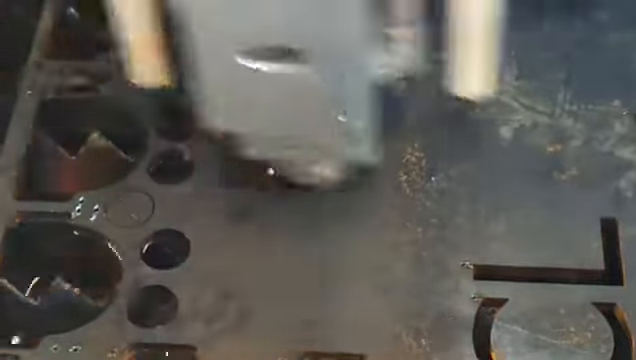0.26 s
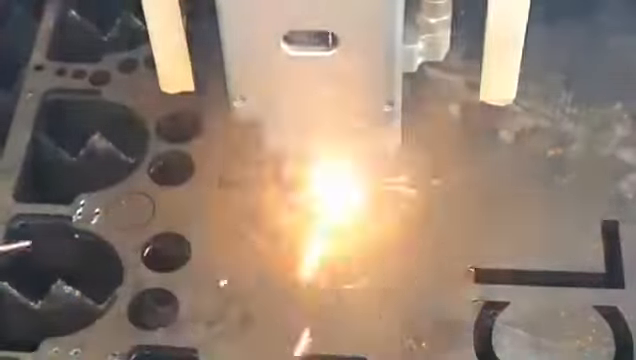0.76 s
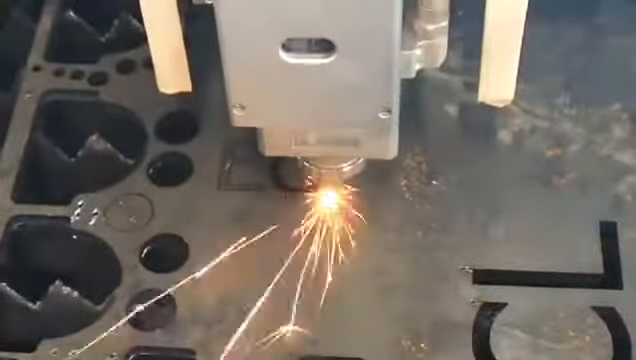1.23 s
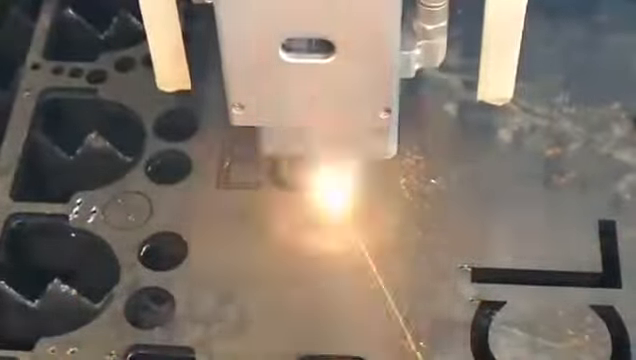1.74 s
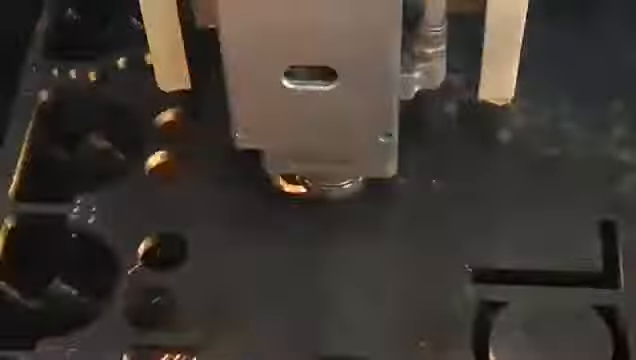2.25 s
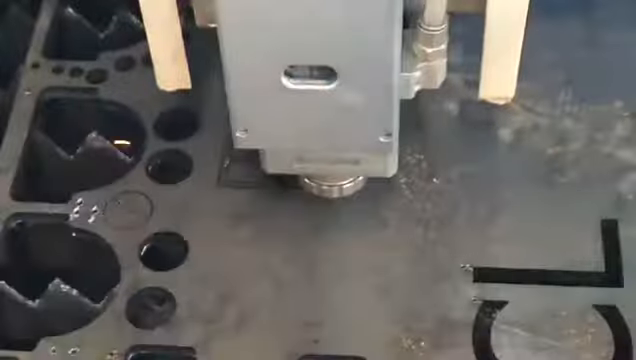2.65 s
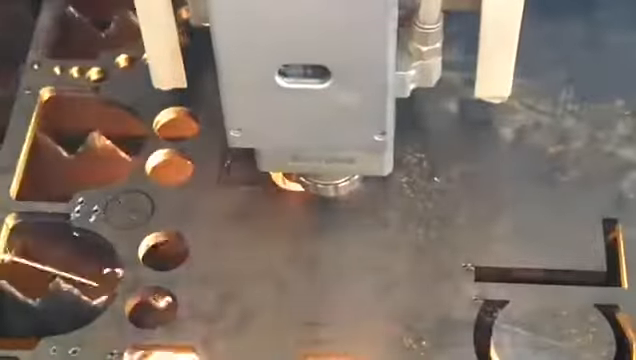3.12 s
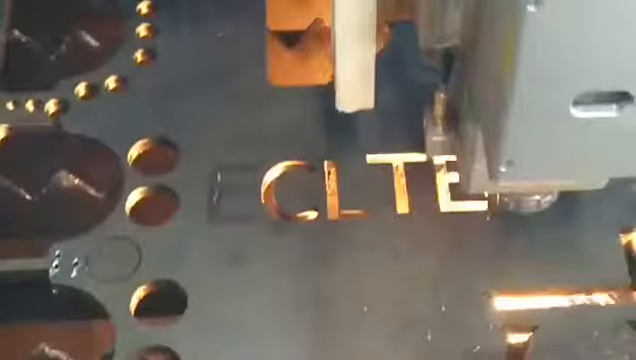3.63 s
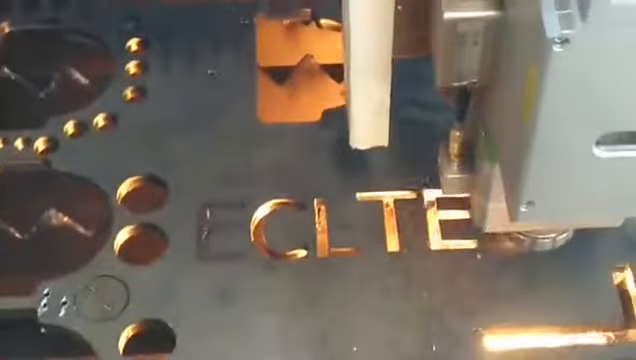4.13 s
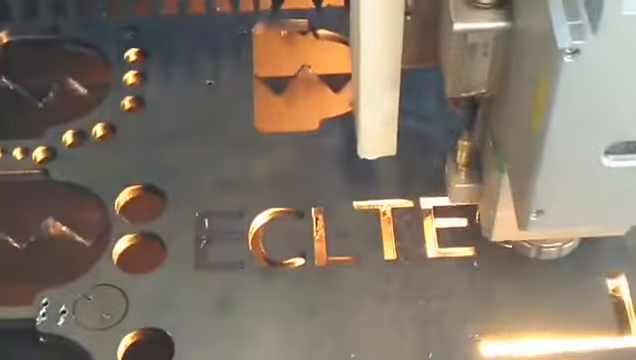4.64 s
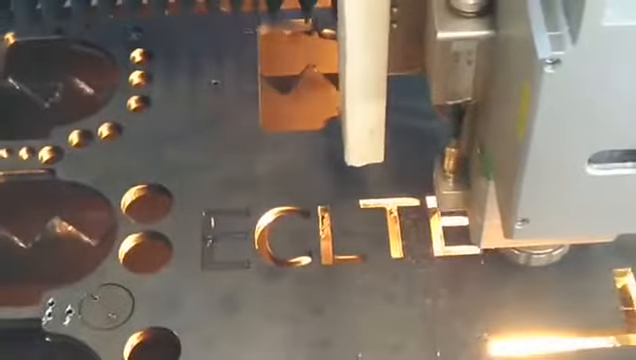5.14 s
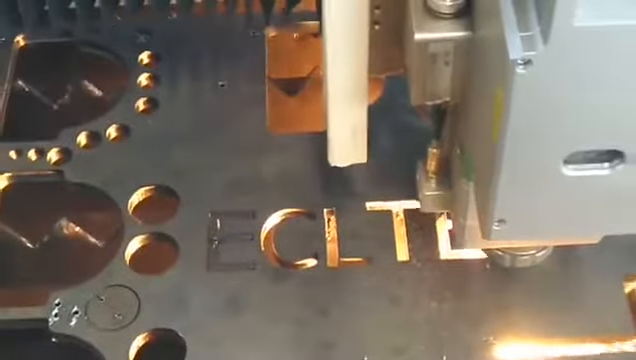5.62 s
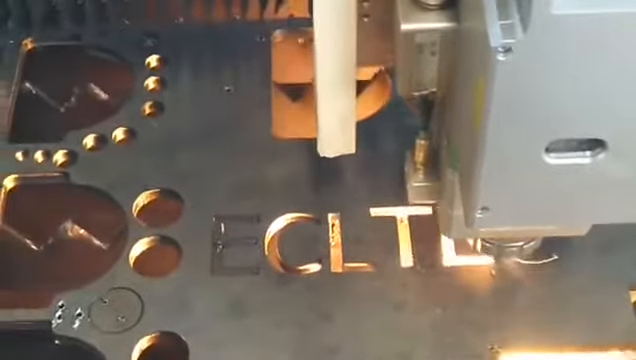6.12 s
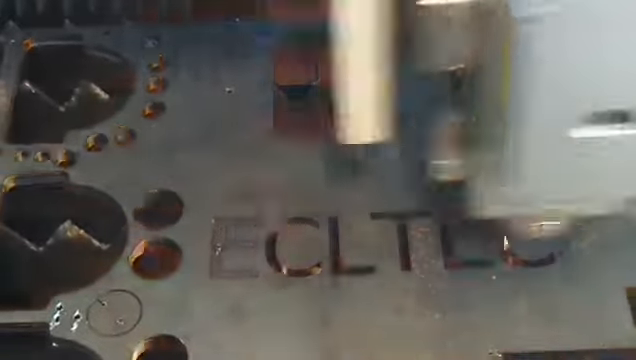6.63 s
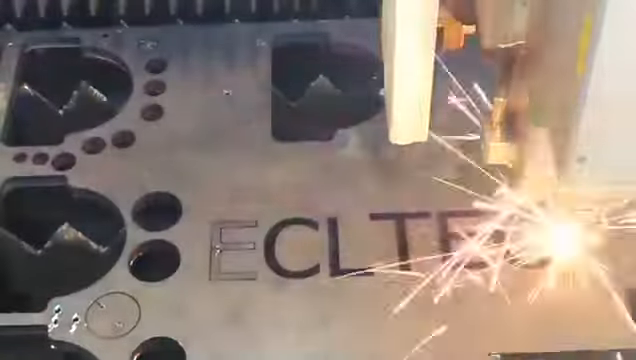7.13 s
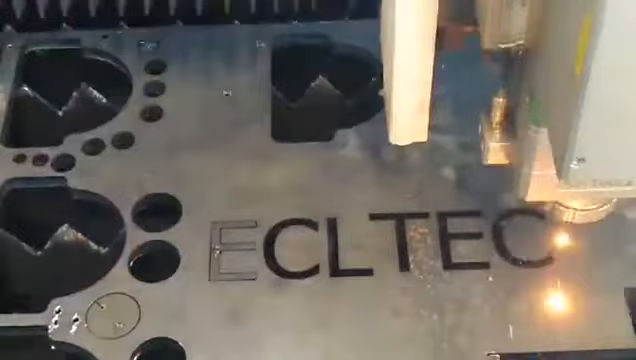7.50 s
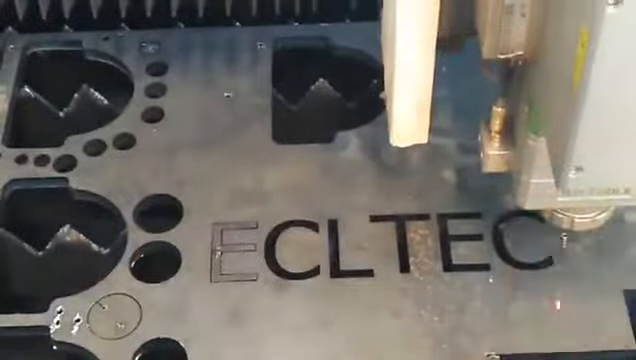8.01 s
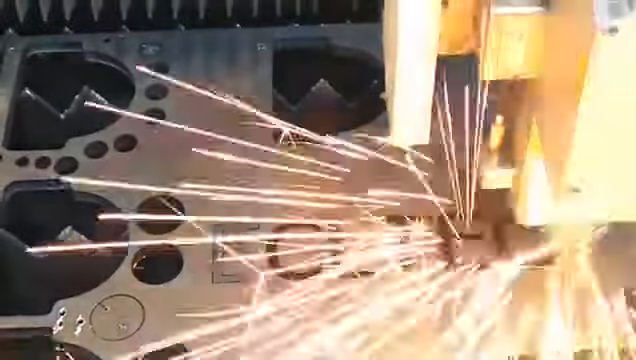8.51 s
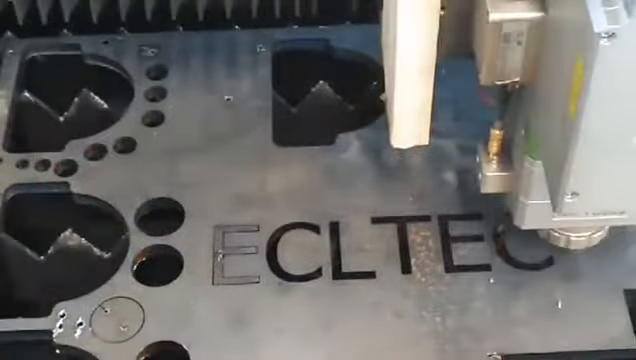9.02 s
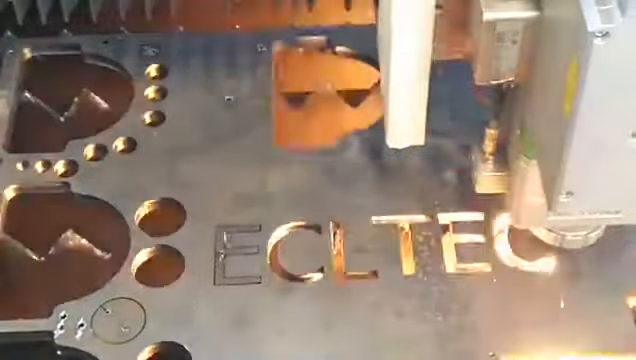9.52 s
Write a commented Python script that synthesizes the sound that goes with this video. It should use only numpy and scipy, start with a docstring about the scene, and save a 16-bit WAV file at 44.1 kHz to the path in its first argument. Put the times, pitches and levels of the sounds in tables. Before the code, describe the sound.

A laser cutter works steel in a workshop with a dull, steady fan rush and wavering hum. Loose pieces clank on ringing slats, smooth bright gas hisses on, and spaced pulses pop and sizzle. The gas shuts off, puffs follow, and a loud whistling jet blows, then drops lower. A heavy clang begins a second hiss and popping series, ending in another strong jet. One small microphone, close, with little deep bass.

```python
"""A laser cutter works on steel plate in a workshop, heard by one small microphone. Fans and pumps rush and
hum throughout, as filtered noise; gas blows faintly in the slot while cut pieces clatter on ringing slats.
Smooth assist gas hisses on, then short beam pulses pop and burn as resonances and sputtering noise.
The gas shuts off, short bursts follow and the jet blows through the kerf as whistling noise, loudly, then lower.
Knocks return, a second piercing hisses and pops, and the jet through the kerf swells again to the end."""
import sys
import numpy as np
from scipy import signal
from scipy.io import wavfile

SR = 44100
rng = np.random.default_rng(int(sys.argv[2]) if len(sys.argv) > 2 else 0)


def generate_wav(signal):
    """Clip the signal to [-1, 1] and save it as 16-bit WAV at the path in sys.argv[1]."""
    frames = np.transpose(np.atleast_2d(signal))
    scaled = np.clip(frames, -1, 1) * 32767
    pcm = np.round(scaled).astype(np.int16)
    wavfile.write(sys.argv[1], SR, pcm)


N = 430416
STEP = 40   # samples per value of a slow curve


def amp(db):
    """Converts dB to amplitude gain."""
    return np.exp(np.asarray(db) * np.log(10) / 20)


def rms_one(x):
    """Scales a signal to rms 1."""
    return x / np.sqrt(np.mean(x ** 2) + 1e-20)


def in_time(rows, start_s=0):
    """Draws the columns of a table as curves per sample; its times count from start_s."""
    times_s, *columns = np.transpose(rows)
    t = np.arange(N) / SR - start_s
    return [np.interp(t, times_s, column) for column in columns]


def at_hz(points, hz):
    """Reads a spectrum table along a logarithmic frequency axis."""
    points = np.array(points)
    return np.interp(np.log(hz), np.log(points[:, 0]), points[:, 1])


def every_sample(slow):
    """Holds each slow value for STEP samples."""
    return np.repeat(slow, STEP)[:N]


def drift(rate_hz):
    """Slow random wander of rms 1: noise through two equal low-pass poles, one value every STEP samples."""
    pole = np.exp(-2 * np.pi * STEP * rate_hz / SR)
    settle = 2000
    noise = rng.standard_normal(N // STEP + settle + 1)
    wander = signal.lfilter([1], [1, -2 * pole, pole * pole], noise)
    return rms_one(wander[settle:])


def resonance(x, hz, width_hz):
    """Two-pole resonance with a gain of about 1 at its peak."""
    r = np.exp(-np.pi * width_hz / SR)
    poles = [1, -2 * r * np.cos(2 * np.pi * hz / SR), r * r]
    return signal.lfilter([(1 - r * r) / 2, 0, (r * r - 1) / 2], poles, x + 1e-18)


def resonances(x, peaks):
    """Sums parallel resonances of one sound, given as rows of hz, width_hz, gain_db."""
    return sum(amp(gain_db) * resonance(x, hz, width_hz) for hz, width_hz, gain_db in peaks)


def bands(spectrum):
    """Splits noise of about rms 1 into third-octave bands: yields centre_hz, noise."""
    edges = 35 * 2 ** np.arange(0, 8.9, 1 / 3)
    centres = np.sqrt(edges[1:] * edges[:-1])
    gains = amp(at_hz(spectrum, centres))
    gains = gains / np.sqrt(np.sum(gains ** 2 * np.diff(edges) * 2 / SR))
    white = rng.standard_normal((2, N))   # neighbouring bands use different noise
    for k, hz in enumerate(centres):
        if gains[k] > gains.max() / 300:   # skip the faintest bands
            band = signal.butter(2, edges[k:k + 2], "band", fs=SR, output="sos")
            yield hz, gains[k] * signal.sosfilt(band, white[k % 2])


def jet(spectrum, colour_db, patchy_db, rate_hz):
    """Turbulent noise, levelled to rms 1 before it flickers partly in step and partly band by band."""
    together, out, power = drift(rate_hz / 2), 0, 0
    for hz, x in bands(spectrum):
        gain = amp(colour_db(hz)) * np.ones(len(together))
        flicker = amp(patchy_db * (0.3 * together + drift(rate_hz)))
        out = out + x * every_sample(gain * flicker)
        power = power + np.var(x[::8]) * gain ** 2
    return out / every_sample(np.sqrt(power))


def bursts(table, tail_t60_s, tail_share):
    """Gated bursts rise in 4 ms, hold, drop and leave a tail; each colour holds until the next burst."""
    level, colour = np.zeros(N + SR), np.zeros(N)
    t = np.arange(round(.3 * SR)) / SR
    for start_s, length_s, start_db, end_db, burst_colour in table:
        i = round(start_s * SR)
        after = np.maximum(t - length_s, 0)
        drop = (1 - tail_share) * np.exp(-after / 0.0021)
        tail = tail_share * amp(-60 * after / tail_t60_s)
        held = amp(np.interp(t, [0, length_s], [start_db, end_db]))
        level[i:i + len(t)] += held * (drop + tail) * np.minimum(t / 0.004, 1)
        colour[i:] = burst_colour
    return level[:N], colour


# spectrum of fans and pumps: hz, relative density_db
SHOP_SPECTRUM = [(18, -41), (30, 6), (86, -3), (201, -4.5), (413, -5), (941, -10), (1740, -16.5),
                 (2500, -17), (2920, -34), (7950, -28), (14000, -29)]
# their rush in time: start_s, level_db
SHOP_LEVEL = [(0, -59.5), (1, -61), (2.5, -64.5), (4, -59), (6.5, -57.5), (7.5, -60), (9.76, -57.5)]
# hum_db is relative to the rush; the width is that of each of two equal resonances
HUM_HZ, HUM_WIDTH_HZ, HUM_DB = 195.8, 19, -7.5


def shop():
    """Fans and pumps of the workshop: a dull rush of noise with a wavering hum of noise narrowed twice."""
    once = resonance(rng.standard_normal(N), HUM_HZ, HUM_WIDTH_HZ)
    hum = rms_one(resonance(once, HUM_HZ, HUM_WIDTH_HZ))
    rush = jet(SHOP_SPECTRUM, lambda hz: 0, patchy_db=3.0, rate_hz=8.4)
    return amp(in_time(SHOP_LEVEL)[0]) * (rush + amp(HUM_DB) * hum)


# steady gas through the kerf: start_s, level_db before the whistles, centre_octaves above 1 kHz
KERF_FLOW = [(0, -49, 1.63), (0.11, -56.5, 1.65), (0.36, -66.5, 0.81), (2.45, -63, 2.3), (2.94, -60.5, 3.1),
             (3.21, -46.5, 1.8), (3.235, -34, 1.67), (3.3, -37.5, 1.77), (3.42, -38.5, 2),
             (3.555, -38, 1.86), (3.575, -57, 1.9), (4.17, -55, 1.78), (4.39, -56, 1.7), (4.5, -47.5, 2.46),
             (4.8, -54, 1.77), (5, -50, 2.03), (5.5, -54, 1.87), (6.4, -55, 1.72), (6.5, -66, 1.8),
             (6.69, -81, 1.2), (8.62, -69, 1.75), (9.3, -66.5, 3.5), (9.37, -40, 2.43), (9.53, -41.5, 2.32),
             (9.63, -37.5, 1.86), (9.76, -37.5, 2.3)]
# short hissing bursts: gas puffs, bright ones as the gas turns on (at 0.376 s and 6.826 s): # start_s,
# length_s, start_db, end_db (before the whistles), centre_octaves above 1 kHz
HISS_BURSTS = [(0.376, 0.019, -23, -34, 3.1), (2.53, 0.016, -36, -37.5, 2.1), (2.69, 0.076, -65, -47, 1.5),
               (2.765, 0.015, -25.5, -41.5, 0.75), (2.965, 0.032, -42, -36.5, 1.82),
               (3.03, 0.03, -50, -49, 1.33), (3.095, 0.058, -37.5, -32, 1.76),
               (3.17, 0.023, -29, -38.5, 1.67), (3.82, 0.069, -54.5, -58, 2.1),
               (4.27, 0.06, -47, -45.5, 1.7), (4.41, 0.055, -43, -43.5, 1.56), (4.61, 0.095, -44, -45, 1.4),
               (4.855, 0.13, -51, -59, 2), (5.84, 0.05, -54, -58, 1.8), (6.826, 0.014, -21.5, -32, 3.27),
               (8.885, 0.021, -53, -56, 2.7), (8.972, 0.023, -57, -52.7, 2.1),
               (9.086, 0.035, -39, -45.5, 2.03), (9.319, 0.034, -32.5, -45.5, 2.24),
               (9.43, 0.054, -37.5, -34.5, 1.93), (9.57, 0.057, -35.5, -40.5, 2)]
# spectrum of the jet before focusing: hz, relative density_db
KERF_SPECTRUM = [(470, -22), (800, 4.5), (1110, -19.5), (1320, 5.5), (1470, -10.5), (1870, -2),
                 (2040, -6.5), (3450, -7.5), (3840, -5.5), (4540, -13.5), (5310, -5), (8170, -5),
                 (14000, -31.5)]
# resonances by which the slot colours the jet: hz, width_hz, gain_db
SLOT_WHISTLES = [(1334, 53, 6), (1826, 42, -0.5), (3430, 140, -9.5), (4630, 300, -3.5), (5170, 70, 2.5),
                 (5700, 89, -2.5), (6170, 420, -10.5)]
KERF_FOCUS_DB = 4.5   # fall per squared octave from the centre
BURST_TAIL_T60_S = 0.19


def kerf():
    """The jet blows steadily through the slot with faint noisy whistles; short bursts hiss in the same noise."""
    level_db, centre = in_time(KERF_FLOW)
    steady = amp(level_db)
    burst, burst_centre = bursts(HISS_BURSTS, BURST_TAIL_T60_S, tail_share=0.65)
    burst_share = burst / (burst + steady)   # the louder one sets the colour
    centre = centre + burst_share * (burst_centre - centre)

    def focus_db(hz):
        return -KERF_FOCUS_DB * (np.log2(hz / 1000) - centre[::STEP]) ** 2

    blow = jet(KERF_SPECTRUM, focus_db, patchy_db=1.64, rate_hz=30)
    return np.hypot(steady, burst) * (blow + resonances(blow, SLOT_WHISTLES))


# cut pieces knock on the bed: start_s, strike_db, centre_octaves above 100 Hz, ring_share of t60
PIECE_DROPS = [(0.046, -27, 3.45, 0.2), (0.197, -28, 2.16, 0.97), (0.233, -18, 2.16, 0.17),
               (0.28, -16.5, 2.37, 0.19), (0.373, -3.5, 2.96, 1), (0.565, -11, 3.25, 0.52),
               (0.648, -23, 2.5, 0.14), (0.728, -25, 2.84, 0.43), (2.104, -19.5, 3.44, 0.29),
               (3.169, -30.5, 3, 0.23), (6.374, -39, 3.1, 0.28), (6.557, -35, 2.2, 0.47),
               (6.71, -0.56, 3.19, 0.96), (6.894, -28.5, 4.7, 0.63), (6.98, -24, 1.86, 0.6),
               (7.17, -31, 2, 0.6), (8.485, -17, 3.9, 0.16)]
# dull low thumps, some under a piece drop: start_s, strike_db, centre_octaves above 100 Hz, ring_share of t60
LOW_THUMPS = [(0.153, -36.5, 1.35, .9), (0.238, -24, 0.86, 0.34), (0.302, -19, 0.78, 0.29),
              (0.569, -20, 1.2, .4), (2.111, -29.5, -0.26, 0.5), (2.973, -20.5, -0.88, 0.97),
              (3.036, -26, -0.35, 0.87), (6.612, -38, 1.1, .6), (6.712, -12, 0.15, 0.78),
              (6.755, -15, 1.3, 0.31), (6.865, -11.5, 1.76, 0.48), (8.663, -32, -0.038, 0.37),
              (8.94, -37, 0.89, .5), (9.275, -40, 1.6, 0.36)]
# ringing modes of the bed: hz, relative level_db, t60_s at full ring_share
BED_MODES = [(90, 2.5, 0.39), (164.6, 0.5, 0.52), (199, 3.5, 0.44), (242.2, 4.5, 0.19), (342, -9.5, 0.11),
             (412, -3.5, 0.29), (550, -10.5, 0.24), (585, -12, 0.49), (673, -4, 0.19), (739, -8, 0.29),
             (814, -18, 0.65), (956, -4, 0.5), (1205, -13, 0.15), (1410, 2.5, 0.16), (1453, -22, 0.16),
             (1910, -9.5, 0.062), (2480, -5.5, 0.13), (2677, -3.5, 0.12), (3270, -23, .15),
             (3530, -34, .15)]
# dense modes of the bed as noise: hz, relative density_db
CLATTER_SPECTRUM = [(50, 6), (90, -1), (200, 5), (500, -2), (1000, -2.5), (1500, -6), (2800, -5),
                    (4500, -13), (8000, -2.5), (14000, -34)]
# decay of the clatter: hz, t60_s at full ring_share
CLATTER_DECAY = [(60, 0.67), (400, 0.8), (1100, 0.26), (3000, 0.37), (8000, 0.3)]
CLATTER_DB, BED_DB, MODE_SPREAD_DB = -12, -22.5, 2
DROP_FALL_DB, THUMP_FALL_DB = 2, 7   # per squared octave from the centre
RATTLE_S, RATTLE_S_PER_RING = .012, .014   # a knock that rings on also rattles longer


def bed():
    """A knock is a short rattle of contacts: it rings the modes and shakes a dense clatter that dies by band."""
    out = np.zeros(N)
    knocks = [(*row, DROP_FALL_DB) for row in PIECE_DROPS] + [(*row, THUMP_FALL_DB) for row in LOW_THUMPS]
    draws = rng.standard_normal((len(knocks), len(BED_MODES) + 24))
    clatter = list(bands(CLATTER_SPECTRUM))
    for (start_s, strike_db, centre, ring, fall_db), draw in zip(knocks, draws):
        i = round(start_s * SR)
        rattle_s = RATTLE_S + RATTLE_S_PER_RING * ring
        t = np.arange(min(round(min(ring, 1) * .7 * SR), N - i)) / SR

        def struck_db(hz):
            return -fall_db * (np.log2(hz / 100) - centre) ** 2

        # twelve contacts of either sign, weaker the later they come
        contacts = np.zeros(len(t))
        when = np.r_[0, np.abs(draw[1:12]) * .6 * rattle_s]
        contacts[(when * SR).astype(int)] = np.sign(draw[12:24]) * np.exp(-when / rattle_s)

        modes = 0
        for (hz, mode_db, t60_s), chance in zip(BED_MODES, draw[24:]):
            if struck_db(hz) > -50:
                decay_db = -60 * t / (t60_s * ring)
                gain = amp(mode_db + struck_db(hz) + MODE_SPREAD_DB * chance + decay_db)
                modes = modes + gain * np.sin(2 * np.pi * hz * t)
        rung = signal.fftconvolve(contacts, modes)[:len(t)]

        shake = 0
        for hz, x in clatter:
            if struck_db(hz) > -50:
                decay_db = -60 * np.maximum(t - rattle_s, 0) / (at_hz(CLATTER_DECAY, hz) * ring)
                shake = shake + x[i:i + len(t)] * amp(struck_db(hz) + decay_db)
        shake = shake * np.minimum(t / .003, 1)   # 3 ms rise

        out[i:i + len(t)] += amp(strike_db) * (amp(BED_DB) * rung + amp(CLATTER_DB) * shake)
    return out


# the piercings: first_long_pulse_s, shut_s after that pulse, gas_db added to the shared course
GAS_PIERCINGS = [(0.712, 1.542, 0.8), (7.09, 1.463, -0.7)]
# gas against the closed plate, alike in every piercing:
# start_s from the first long pulse, level_db before gas_db is added
GAS_COURSE = [(-.35, -69), (-.24, -52.5), (.11, -41), (.4, -45), (.65, -43.5), (1.0, -40), (1.27, -46),
              (1.36, -35.5), (1.45, -43)]
SHUT_DB_PER_S = 276


def gas_flow():
    """The valve opens before each piercing, the gas follows one course, then the shut valve fades it fast."""
    t = np.arange(N) / SR
    flow = np.zeros(N)
    for pulse_s, shut_s, gas_db in GAS_PIERCINGS:
        shut_fall_db = SHUT_DB_PER_S * np.maximum(t - pulse_s - shut_s, 0)
        is_open = t > pulse_s + GAS_COURSE[0][0]
        flow += amp(in_time(GAS_COURSE, pulse_s)[0] + gas_db - shut_fall_db) * is_open
    return flow


# spectrum of the gas spreading over the plate: hz, relative density_db
NOZZLE_SPECTRUM = [(880, -56), (1500, -20), (2200, -15), (2350, -12), (3290, -20), (3480, -17),
                   (4310, -9.5), (6390, -0.5), (7420, -5), (8300, 0.5), (11200, -7.5), (12800, -6.5),
                   (14000, -12)]
# resonances of the gap under the nozzle: hz, width_hz, gain_db
NOZZLE_GAP = [(6520, 760, -8), (8460, 1300, -2)]


def nozzle():
    """Gas spreads over the plate as a smooth bright hiss, and the gap under the nozzle resonates."""
    hiss = jet(NOZZLE_SPECTRUM, lambda hz: 0, patchy_db=1.7, rate_hz=6.3)
    return gas_flow() * rms_one(hiss + resonances(hiss, NOZZLE_GAP))


# beam pulses while piercing: start_s, length_s, pop_db, burn_start_db, burn_end_db,
# brightness_db per octave (all levels before the sputter and the pit's resonances)
BEAM_PULSES = [(0.617, 0.003, -33, -31, -28.5, -4.5), (0.644, 0.017, -35, -29, -26, -1),
               (0.711, 0.052, -42, -22.5, -20, 0.2), (1.511, 0.018, -32, -20, -19, -0.1),
               (1.598, 0.031, -29, -28, -24, 2), (1.699, 0.03, -38, -36.5, -29, 3.5),
               (1.801, 0.037, -22.5, -28.5, -36.5, 4.5), (1.898, 0.037, -27, -26, -30, 3),
               (2, 0.023, -16.5, -37, -23.5, 2), (2.1, 0.046, -15, -31, -31.5, -1),
               (2.214, 0.024, -36, -38, -38.5, 1.5), (6.998, 0.0043, -40, -36, -35, 3),
               (7.022, 0.0028, -36, -31, -35, 2), (7.036, 0.008, -29.5, -29, -31, 2),
               (7.094, 0.052, -31, -24.5, -23.5, 0.8), (7.881, 0.018, -28, -15.5, -21, -0.5),
               (7.969, 0.028, -40, -25, -25, 1.6), (8.069, 0.031, -31, -23, -27, 1.8),
               (8.166, 0.033, -27, -28, -30.5, 2), (8.266, 0.037, -22, -23, -33.5, 0.8),
               (8.367, 0.028, -18, -32.5, -25.5, 2.5), (8.466, 0.039, -12.5, -28.5, -30.5, 0)]
# spectrum of the burn before its brightness: hz, relative density_db
BURN_SPECTRUM = [(180, -45), (300, -34), (738, -13), (986, -13.5), (1380, 7.5), (1650, -6), (2310, 6),
                 (2630, -4), (4350, 5), (5200, -6.5), (5970, 0.5), (12500, -13), (14000, -19)]
# resonances of the pit: hz, width_hz, gain_db
PIT_RINGS = [(1500, 950, 7), (2470, 630, 2), (4200, 600, 25), (8460, 1800, 9)]
FLASH_S, BURN_TAIL_T60_S = .002, 0.23


def beam():
    """Each pulse opens with a hiss, pops in the pit, flashes, burns with a sputter, then drops into a tail."""
    burn_rows = np.delete(BEAM_PULSES, 2, axis=1)   # without pop_db
    level, brightness = bursts(burn_rows, BURN_TAIL_T60_S, tail_share=0.25)
    clicks = np.zeros(N)
    for start_s, _, pop_db, *_ in BEAM_PULSES:
        clicks[round((start_s + .002) * SR)] = amp(pop_db)   # 2 ms into the pulse
    # neighbouring pit resonances have opposite sign
    pops = resonances(clicks, PIT_RINGS[::2]) - resonances(clicks, PIT_RINGS[1::2])
    flash = signal.lfilter([1], [1, -np.exp(-1 / (FLASH_S * SR))], clicks)

    def tilt_db(hz):
        return brightness[::STEP] * np.log2(max(hz, 900) / 4000)

    sputter = every_sample(amp(1.03 * drift(190)))
    burn = jet(BURN_SPECTRUM, tilt_db, patchy_db=2.5, rate_hz=57)
    return (level + flash) * sputter * burn + pops


ECHO_COUNT, ECHO_SPAN_S, ECHO_DB = 14, .01, -8.5


def head_and_plate(x):
    """Close echoes between head, plate and slats comb the sound at the nozzle into many fine bands."""
    lags = rng.uniform(.2, 1, ECHO_COUNT)   # shares of the span
    taps = np.zeros(round(ECHO_SPAN_S * SR) + 2)
    signs = rng.choice([-1, 1], ECHO_COUNT)
    taps[(lags * ECHO_SPAN_S * SR).astype(int)] = amp(ECHO_DB - 17.9 * lags) * signs   # later is weaker
    taps[0] = 1   # direct sound
    return signal.oaconvolve(x, taps / np.linalg.norm(taps))[:N]


def scene():
    """Mixes the echoing cutting head, the bed and the shop at one microphone."""
    head = head_and_plate(beam() + nozzle() + kerf())
    return (head + bed() + shop())[None]


LOW_CUT_HZ, CUTOFF_HZ = 72.5, 13900


def record(dry):
    """The small microphone loses the deep bass; the top is cut steeply."""
    low_cut = signal.butter(4, LOW_CUT_HZ, "high", fs=SR, output="sos")
    top_cut = signal.ellip(10, .5, 70, CUTOFF_HZ, fs=SR, output="sos")
    return signal.sosfilt(top_cut, signal.sosfilt(low_cut, dry))


dry = scene()
out = record(dry)
generate_wav(out)
```